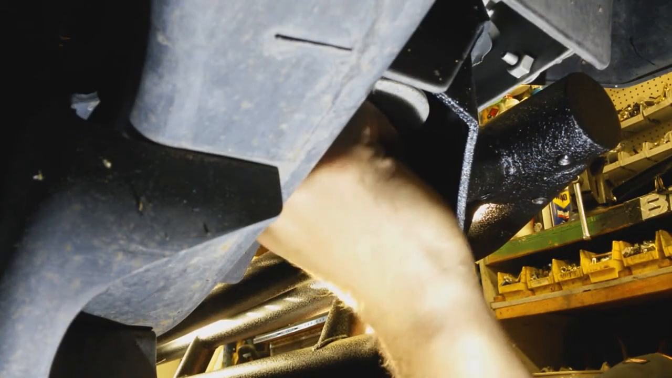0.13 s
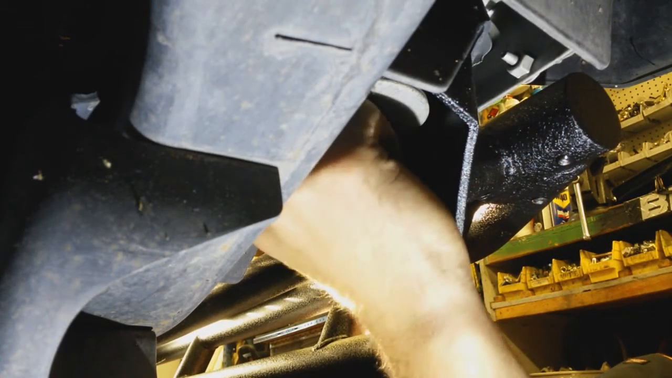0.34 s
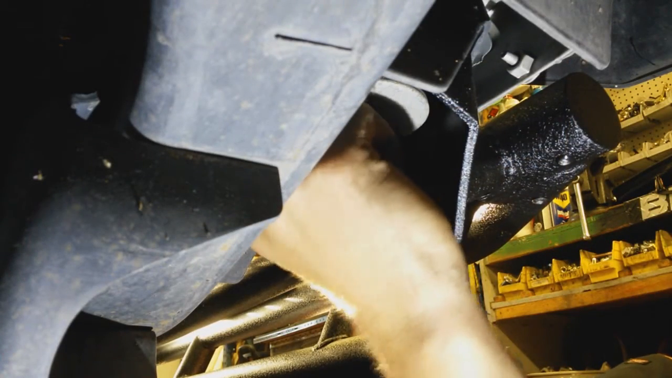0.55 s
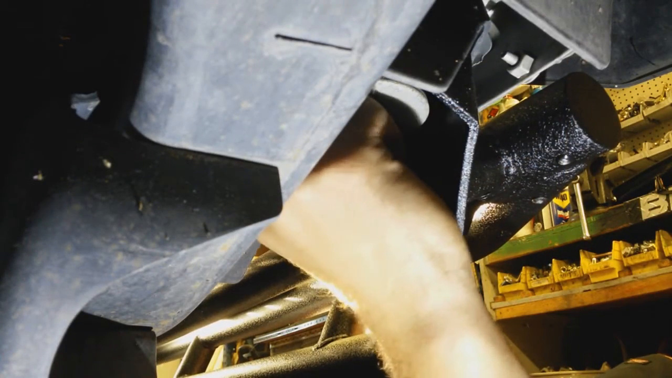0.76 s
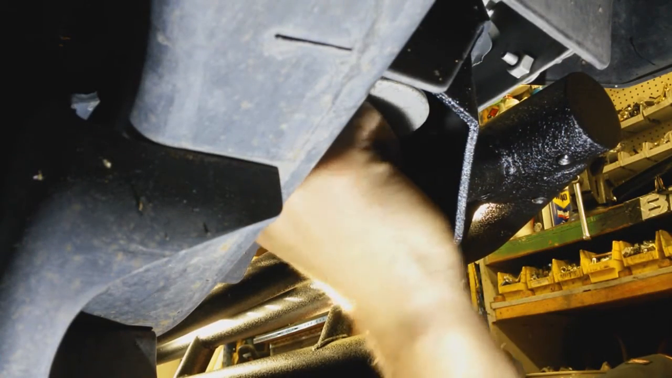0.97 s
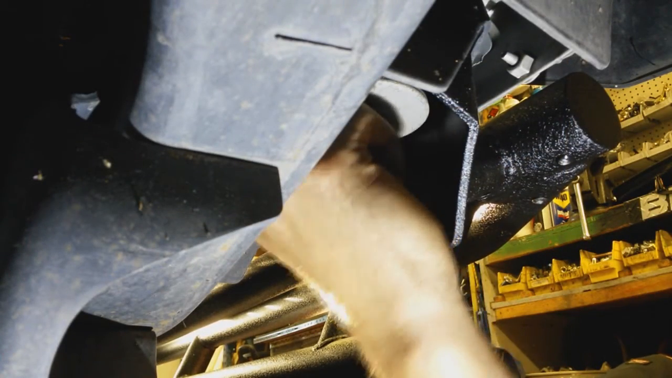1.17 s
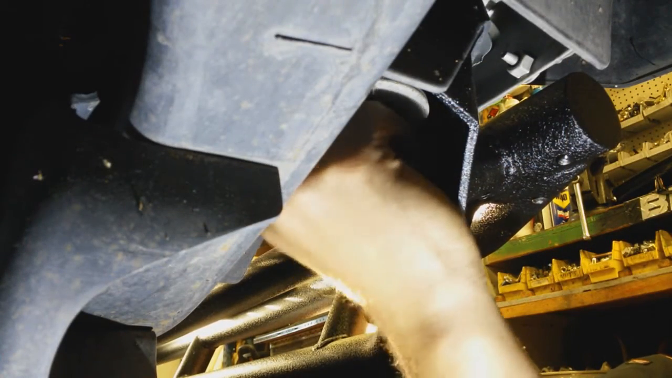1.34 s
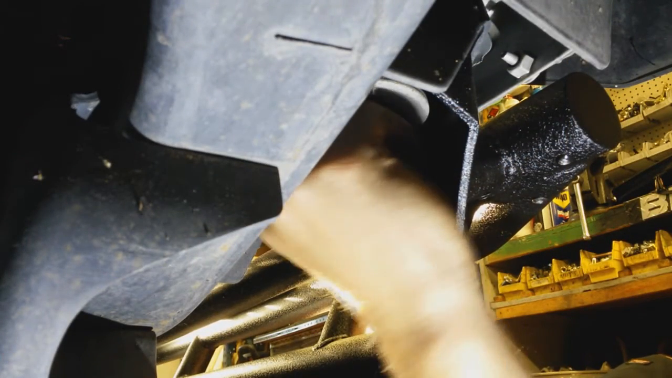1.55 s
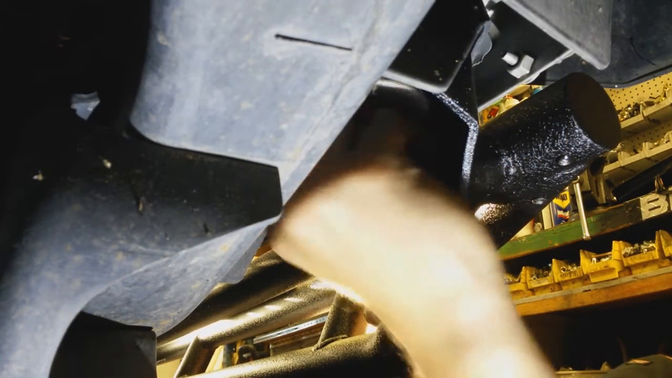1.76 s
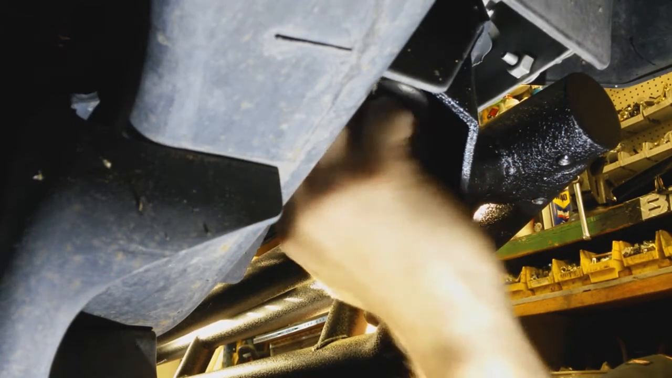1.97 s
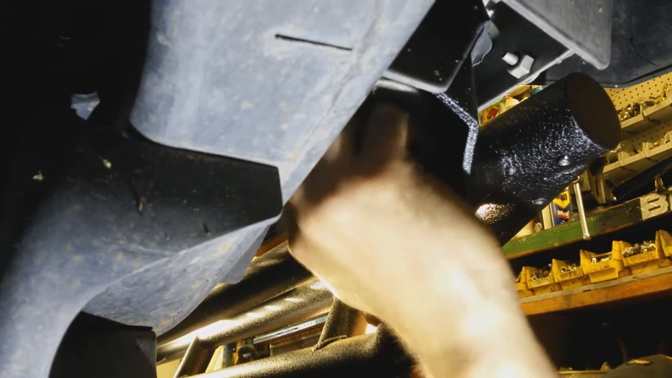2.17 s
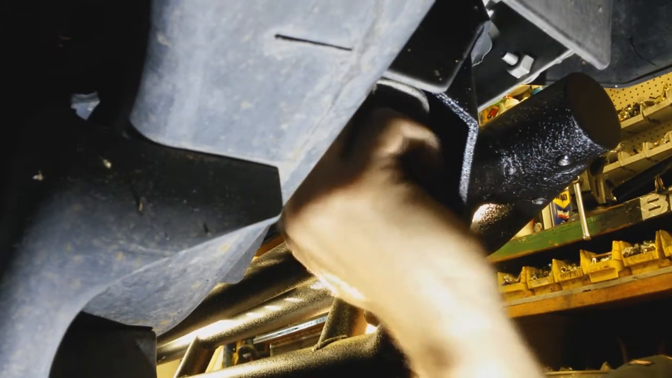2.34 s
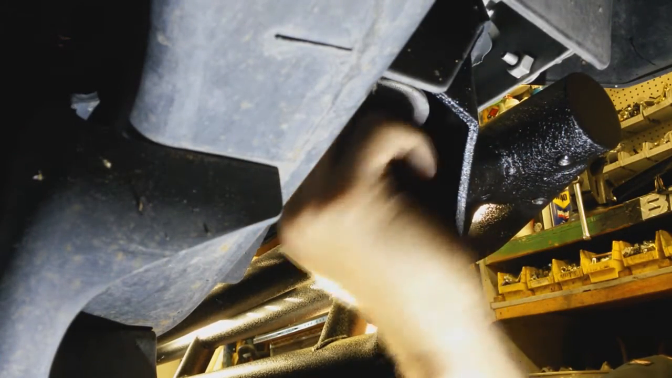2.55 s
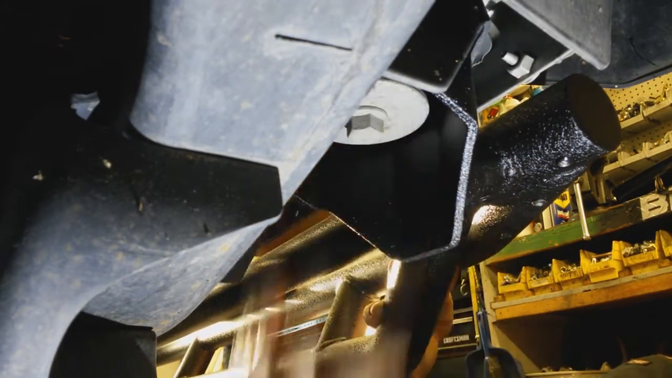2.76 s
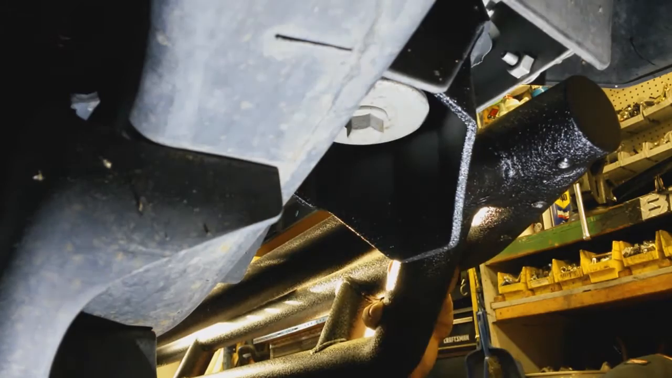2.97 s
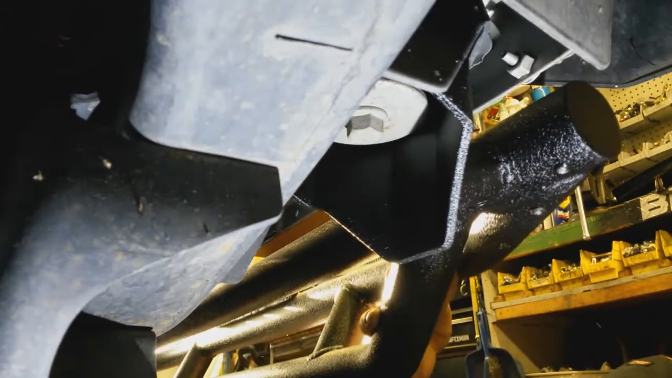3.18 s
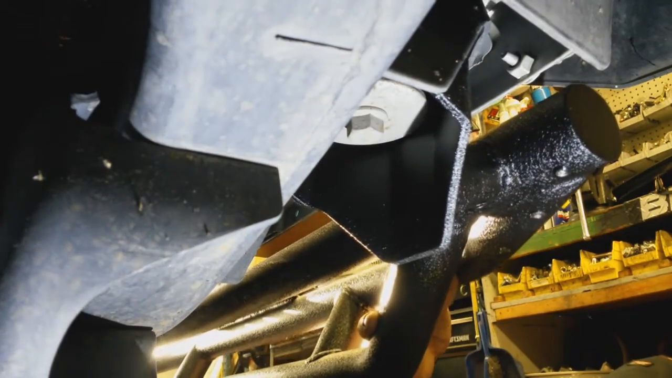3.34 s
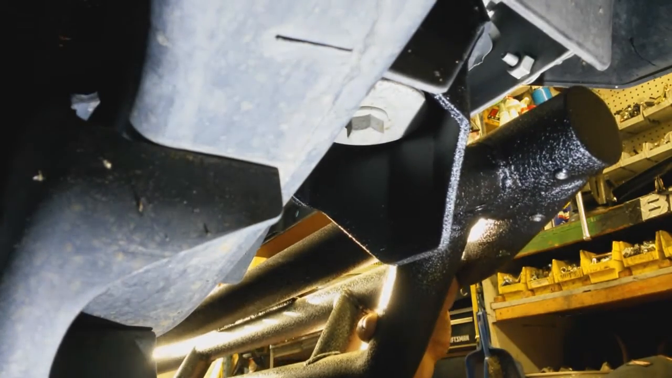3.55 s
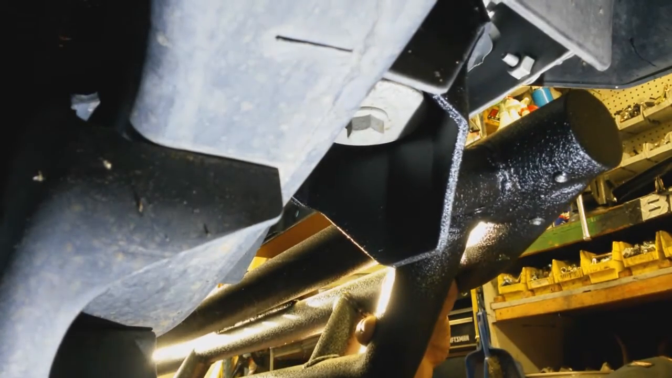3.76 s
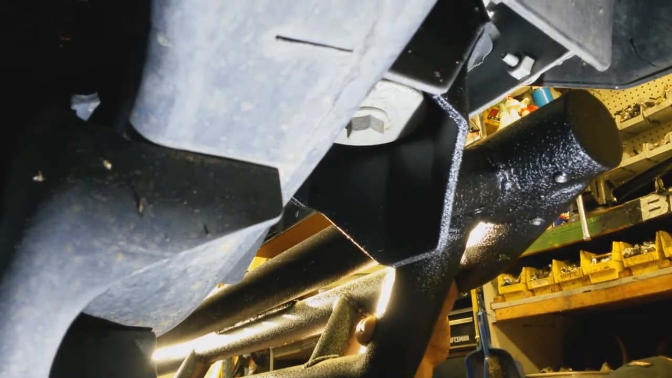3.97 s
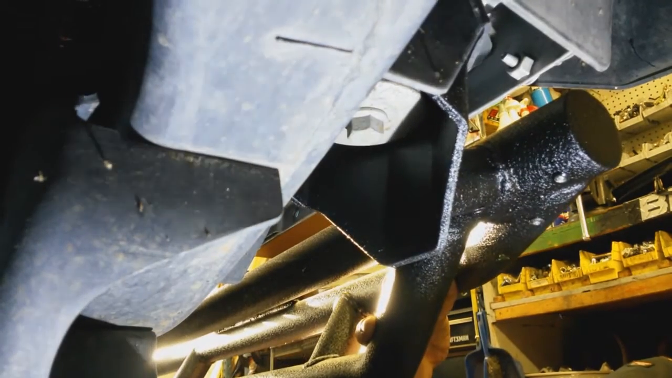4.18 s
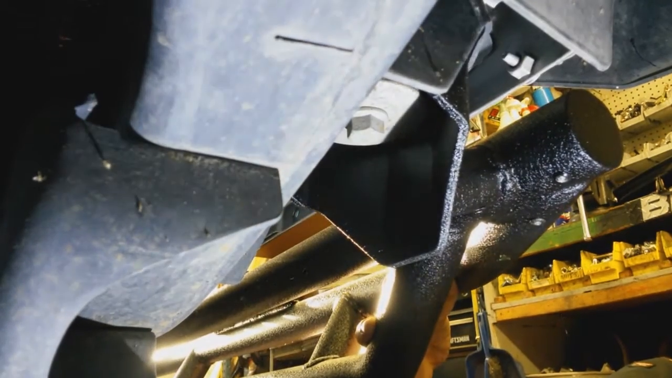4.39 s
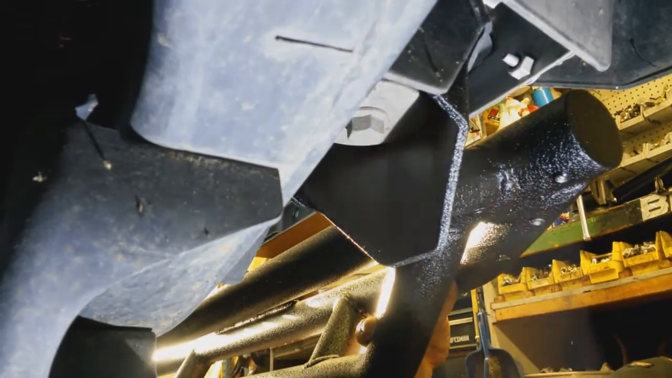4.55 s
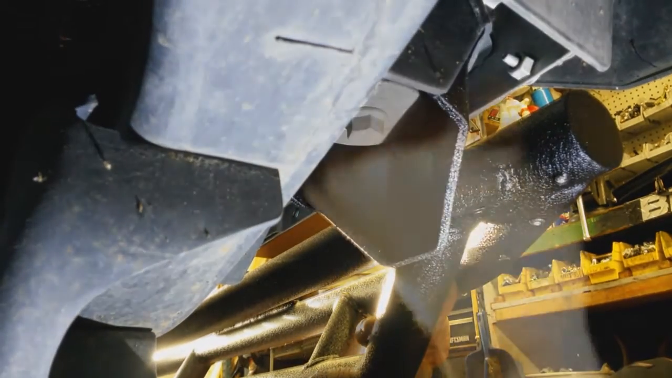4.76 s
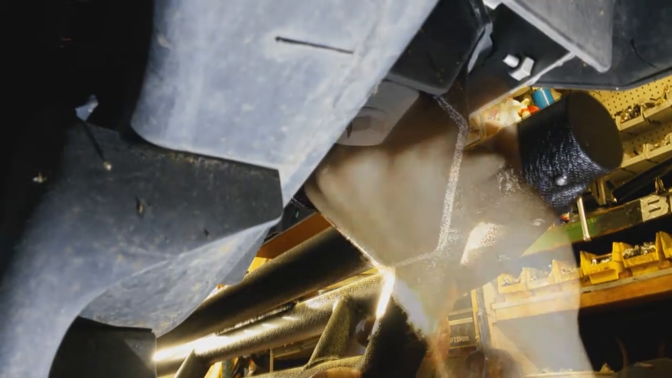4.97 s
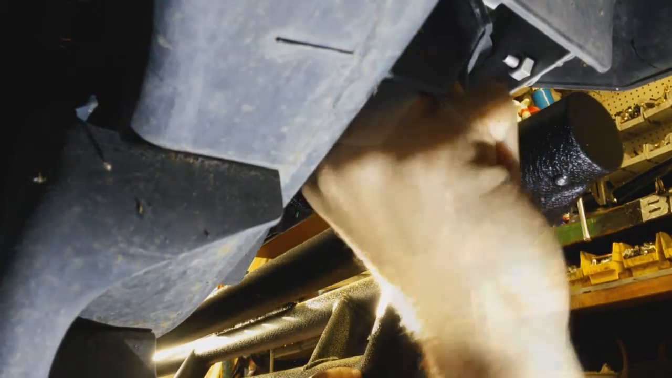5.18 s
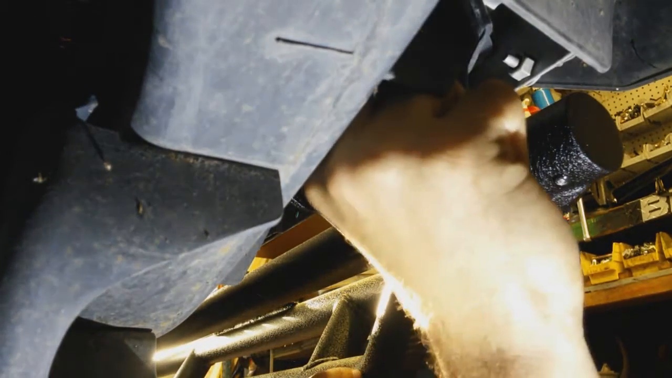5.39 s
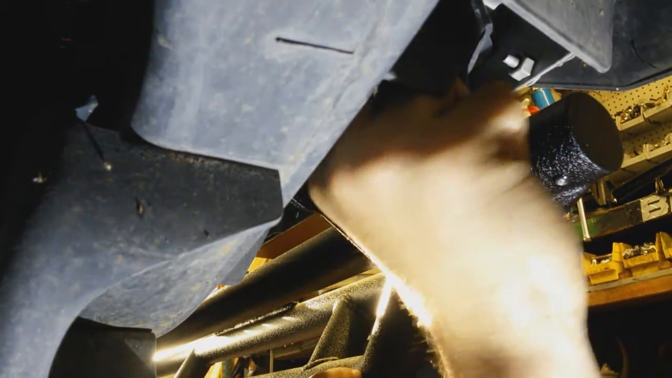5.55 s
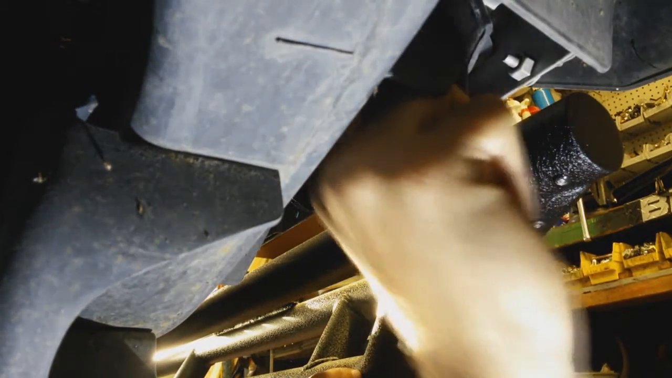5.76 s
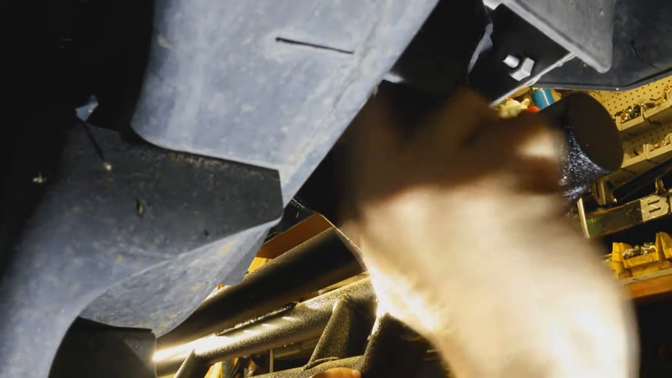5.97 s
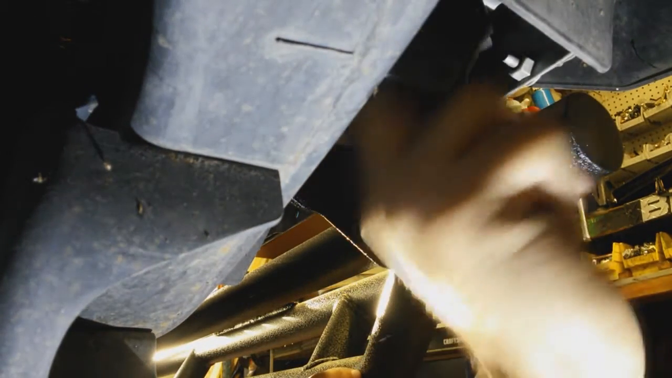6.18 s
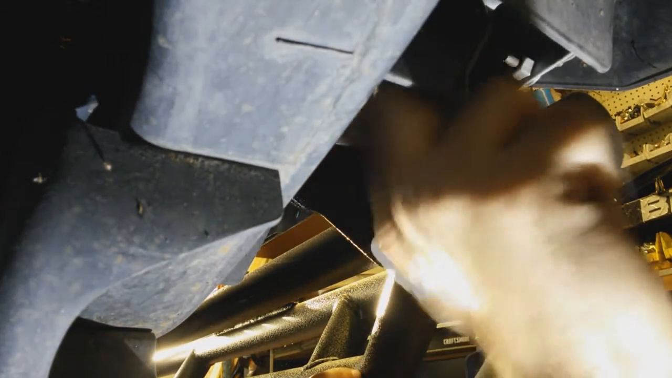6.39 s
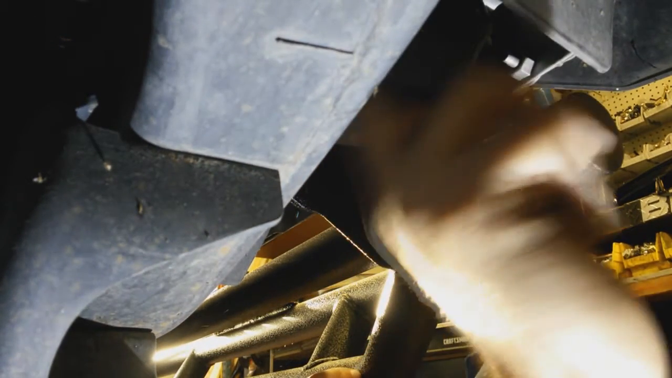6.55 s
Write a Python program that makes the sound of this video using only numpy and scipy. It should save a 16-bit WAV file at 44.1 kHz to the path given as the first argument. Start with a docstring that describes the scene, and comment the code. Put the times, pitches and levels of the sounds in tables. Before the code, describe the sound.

A loose steel washer clanks and scrapes onto a stud under a vehicle, then after a lull a nut clicks sharply, in a quiet rumbling workshop.

```python
"""A big steel washer clatters onto a stud under a vehicle; then a nut is picked up and started on the thread.
Each contact is a burst of noise through the frame's resonances plus the ringing modes of the loose steel.
Slides are runs of tiny slips that make noise in one region of the frame; pressed hard, they groan.
Dull knocks and sharp ticks of handled parts come in between. The room is soft rumble and hiss from shaped noise,
and an engine outside is two gliding sine tones that speed up and then ease off."""
import sys
import numpy as np
from scipy import signal
from scipy.fft import rfft, irfft, next_fast_len
from scipy.io import wavfile
from scipy.ndimage import uniform_filter1d, map_coordinates

SR = 44100
rng = np.random.default_rng(int(sys.argv[2]) if len(sys.argv) > 2 else 0)


def pcm_store(signal):
    """Save signal as 16-bit PCM."""
    levels = np.round(np.clip(np.atleast_2d(signal), -1, 1) * 32767)
    wavfile.write(sys.argv[1], SR, levels.astype(np.int16).T)


N = 292101  # length in samples

# Colour of the noise when the washer hits or slides. Each row: frequency in Hz, level in dB per Hz.
WASHER_COLOUR = [(180, -40.5), (300, -26.5), (482, -20.5), (714, -21.5), (975, -8.5), (1310, -14.5),
                 (1490, -8), (2280, -8.5), (4620, -10.5), (5260, -4.5), (7790, -13), (9330, -10),
                 (11400, -23), (12700, -12), (15000, -39)]
# Ringing modes heard when the nut is struck; the long rows near 3.1 kHz are the washer ringing along with it.
# Each row: frequency in Hz, level in dB, free time to fall by 60 dB in seconds.
NUT_MODES = [(1895, -12, .15), (2250, -10, .22), (3070, -10, .52), (3135, -9, .54), (3165, -10, .5),
             (3403, -12, .3), (3990, -11, .22), (4646, -11, .2), (5279, 4, .3), (5435, 1, .27),
             (5492, 4, .3), (5722, -5, .22), (5790, -6, .22), (6035, -2, .09), (6307, -6, .2),
             (7106, -7, .09), (8559, -10, .1), (9300, -14, .13), (10810, -13, .08)]


def amp(db):
    """Turn decibels into a plain amplitude factor."""
    return 10 ** (np.asarray(db) / 20)


def unit(x):
    """Scale a signal to rms 1."""
    return x / np.sqrt(np.mean(x ** 2) + 1e-20)


def along(points, hz):
    """Read a curve of (Hz, value) points on a logarithmic frequency axis."""
    point_hz, values = np.transpose(points)
    return np.interp(np.log(hz + 1), np.log(point_hz + 1), values)


def curves(rows):
    """Give one value per sample for each column after the time."""
    seconds, *columns = np.transpose(rows)
    return [np.interp(np.arange(N) / SR, seconds, column) for column in columns]


def wobble(rate):
    """Draw a smooth random curve with this many knots a second."""
    knots = rng.standard_normal(int(N * rate / SR) + 4)
    return map_coordinates(knots, [np.arange(N) * rate / SR])


def filtered(x, response):
    """Multiply the spectrum of x by a response of frequency."""
    count = x.shape[-1]
    padded = next_fast_len(count + 4096)
    spectrum = rfft(x, padded) * response(np.fft.rfftfreq(padded, 1 / SR))
    return irfft(spectrum, padded)[..., :count]


def add(track, s, sound):
    """Mix a stereo sound into the track at time s, cutting what lies outside."""
    start = round(s * SR)
    part = sound[:, max(-start, 0):N - start]
    track[:, max(start, 0):][:, :part.shape[1]] += part


def panned(x, pan_db):
    """Lean a stereo pair to the left (positive) or right (negative)."""
    return x * unit(amp([[pan_db / 2], [-pan_db / 2]]))


def frame_noise(shape, colour, lift_db, ripple_db):
    """Noise of rms 1 through the frame: a few main resonances over a thicket of small ones."""
    # Main resonances. Each row: frequency in Hz, width in Hz, strength in dB (a quarter of it shapes the peak).
    frame = [(587, 32, -2.5), (1136, 70, -3), (1590, 33, 2.5), (1794, 31, -2.5), (2220, 8.6, -0.5),
             (2330, 68, -6.5), (3220, 40, -1), (3780, 110, -5.5), (4540, 41, -7), (5350, 110, -4.5),
             (5900, 200, 2.5), (6310, 170, -1), (6640, 170, 1.5), (6850, 23, -2.5)]
    thicket = rng.standard_normal(800)

    def response(hz):
        peaks = [amp(db / 4) / (1 + (2 * (hz - centre) / width) ** 2) for centre, width, db in frame]
        ripple = np.interp(hz, np.linspace(0, SR / 2, len(thicket)), thicket)
        return amp(along(colour, hz) + lift_db * np.max(peaks, axis=0) + ripple_db * ripple)

    return unit(filtered(rng.standard_normal(shape), response))


def dying(x):
    """Under the vehicle each frequency dies away at its own speed."""
    # Each row: frequency in Hz, time to fall by 60 dB in seconds.
    underbody = [(300, 1), (900, 0.37), (2100, 0.27), (2750, 0.37), (3100, 0.23), (3600, 0.32),
                 (5500, 0.16), (13000, 0.26)]
    hz, t, z = signal.stft(x, SR, nperseg=256)
    decay = amp(-60 * t / along(underbody, hz)[:, None])
    return signal.istft(z * decay, SR, nperseg=256)[1][:, :x.shape[1]]


def ring(modes, t, life, scatter_db):
    """Modes are struck at new strengths and heard differently at each ear; life scales their decay time."""
    hz, db, t60 = np.transpose(modes)
    size = amp(db + scatter_db * rng.standard_normal((2, len(hz))))
    phase = np.exp(2j * np.pi * rng.random((2, len(hz))))
    waves = np.exp(np.outer(2j * np.pi * hz - np.log(1000) / (t60 * life), t))
    return ((size * phase) @ waves).real * 2 / np.linalg.norm(size)


def voiced(x, brightness_db, softness):
    """The place of a blow tilts and dents its spectrum, and a soft contact takes off the treble."""
    hard_hz, tilt_from_hz = 14000, 1400  # treble limit at softness 0; brightness acts above the second
    place_db, place_hz = 1.8, 350  # depth and spacing of the random peaks and dents
    peaks_db = place_db * rng.standard_normal(SR // 2 // place_hz + 1)

    def response(hz):
        tilt = amp(brightness_db * np.log2(np.maximum(hz / tilt_from_hz, 1)))
        place = amp(np.interp(hz / place_hz, np.arange(len(peaks_db)), peaks_db))
        return tilt * place / (1 + (hz / hard_hz * 2 ** softness) ** 4)

    x = filtered(x, response)
    return x / np.sqrt(np.mean(x[:, :SR // 30] ** 2))  # the opening 1/30 s has rms 1


def contacts(hits, modes, colour, clatter_t60, tail_db, lift_db, ripple_db, chatter_db, ring_db, crack_db,
             scuff_db, rise_s, pan_db, held=True):
    """Each contact: a brief scuff, a crack and a chattering burst, the ring of the steel and the underbody's answer."""
    # Fingers damp the steel they hold. Each row: time in seconds, share of its free ring, in strength and length.
    grip = [(.4, 1), (.7, 0.57), (2.0, 0.64), (2.3, 0.81), (3.2, 0.56), (4.9, 0.11), (4.97, 0.82),
            (6.2, 0.81)]
    crack_t60 = .008  # seconds for the first sharp crack to fall by 60 dB
    out, t = np.zeros((2, N)), np.arange(SR * 2 // 5) / SR
    lead = SR // 100  # samples of scuff
    noises = frame_noise((len(hits), 2, 2, len(t)), colour, lift_db, ripple_db)
    burst = amp(-60 * t / clatter_t60) + amp(crack_db - 60 * t / crack_t60)
    attack = 1 - np.exp(-t / max(rise_s, 1e-4))
    for (s, db, brightness_db, softness), (clatter, answer) in zip(hits, noises):
        flutter = uniform_filter1d(rng.standard_normal((2, len(t))), 44, axis=1)  # smoothed over 1 ms
        clatter = unit(amp(chatter_db * unit(flutter)) * clatter)
        free = np.interp(s, *np.transpose(grip)) if held else 1
        tone = free * ring(modes, t, free, scatter_db=2.0)
        blow = clatter * burst + amp(tail_db) * dying(answer) + amp(ring_db) * tone
        # the parts graze before they meet
        scuff = amp(scuff_db) * clatter[:, -lead:] * np.linspace(0, 1, lead) ** 2
        sound = voiced(np.hstack([scuff, blow * attack]), brightness_db, softness)
        add(out, s - lead / SR, amp(db) * panned(sound, pan_db))
    return out


def scrape(strokes, centre_hz, width):
    """A run of tiny slips shakes one region of the frame's resonances; width is in octaves."""
    slip_rate, slip_life = 320, .003  # slips a second; seconds for a slip's energy to fall to 1/e
    tail_db, tail_t60 = -18, .22  # weaker, longer tail of a slip; seconds to fall by 60 dB
    out, t = np.zeros((2, N)), np.arange(SR * 2 // 5) / SR
    noises = frame_noise((len(strokes), 2, len(t)), WASHER_COLOUR, lift_db=6.5, ripple_db=11)
    fade = np.exp(-t / slip_life) + amp(tail_db - 60 * t / tail_t60) ** 2  # energy left after one slip
    for (s, length, db), rub in zip(strokes, noises):
        rub = unit(filtered(rub, lambda hz: 1 / (1 + (np.log2((hz + 1) / centre_hz) / width) ** 2)))
        pressure = np.sin(np.pi * np.minimum(t / length, 1))
        happens = rng.random(len(t)) < slip_rate / SR
        slips = happens * rng.exponential(size=len(t)) * pressure ** 2
        energy = np.abs(signal.fftconvolve(slips, fade)[:len(t)])
        level = np.sqrt(energy / (np.mean(energy[t < length]) + 1e-12))
        add(out, s, amp(db) * panned(rub * level, pan_db=-2.5))
    return out


def noise(spectrum, count):
    """Stereo noise of rms 1, alike at both ears in the bass and unrelated in the treble."""
    # Each row: frequency in Hz, left-right likeness from 0 to 1.
    alike = [(60, .9), (150, .8), (370, .5), (940, .05), (15000, 0)]

    def response(hz):
        turn = np.arccos(np.clip(along(alike, hz), -1, 1)) / 2
        return amp(along(spectrum, hz)) * [np.cos(turn), np.sin(turn)]

    mid, side = filtered(rng.standard_normal((2, count)), response)
    return unit(np.array([mid + side, mid - side]))


def washer():
    """The loose washer strikes stud and frame, so it clatters and its many modes ring."""
    # Each row: start in seconds, level in dB, brightness in dB per octave, softness in octaves of lost treble.
    hits = [(0.0, -18, 1, 0.52), (.135, -29.5, 0, 0.36), (.141, -13.5, 4.5, 0.6), (.291, -46.5, -0.5, 0.49),
            (.387, -53.5, 4, 1.24), (.493, -46, -4, 0.24), (.65, -39, -8.5, 0.76), (.826, -37, -5.5, 1.74),
            (.985, -45, -2.5, .5), (.994, -34.5, -3, 0.47), (1.154, -50, -5.5, 0.56),
            (1.45, -43.5, -1, 0.68), (1.473, -33, 0.5, 0.57), (1.545, -38, -6.5, .8),
            (1.552, -25.5, 5.5, 1.55), (1.56, -23.5, 4, 1.54), (1.679, -45, -3.5, 0.5),
            (1.813, -41.5, 6, 2.15), (1.908, -25.5, 6.5, 1.5), (2.005, -32, 4.5, 1.52),
            (2.039, -29, 0.5, 0.99), (2.15, -39.5, 5.5, 1.46), (2.271, -19.5, 2.26, 0.77),
            (2.348, -33.5, 1, .3), (2.394, -34, 1, 0.98), (2.411, -31, 2, 1.15), (2.429, -38.5, -2, .8),
            (2.553, -21.5, 3, 0.68), (2.6, -35, .5, .5), (2.618, -30, 6.5, 1.66), (2.65, -33, 4, 1.17),
            (2.709, -31, 7.5, 1.73), (2.726, -36, -3.5, 0.51)]
    # Each row: frequency in Hz, level in dB, free time to fall by 60 dB in seconds.
    modes = [(845, -12, .4), (921, -7, .55), (1440, -8, .25), (1599, -12, .26), (1803, -5, .35),
             (1939, -9, .25), (2013, -10, .3), (2212, -8, .22), (2365, -4, .25), (2582, -7, .22),
             (2972, -6, .28), (3031, -5, .33), (3064, -6, .3), (3155, -8, .33), (3195, -4, .32),
             (3332, -11, .33), (3478, -11, .33), (3544, -5, .2), (3623, -4, .2), (3820, -6, .21),
             (4027, -8, .24), (4414, -11, .34), (4560, -13, .34), (4764, -8, .17), (5190, -8, .28),
             (5320, -4, .22), (5860, -5, .22), (6530, -8, .16), (8900, -18, .25), (9033, -17, .18)]
    return contacts(hits, modes, WASHER_COLOUR, clatter_t60=.062, tail_db=-5.5, lift_db=7.5, ripple_db=5.0,
                    chatter_db=5.0, ring_db=-10.5, crack_db=-0.5, scuff_db=-26, rise_s=.0011, pan_db=-4.0)


def workshop():
    """The room is low rumbling noise with a thin, slowly drifting hiss on top."""
    # Each row: time in seconds, rumble level in dB.
    room = [(0, -55), (3.1, -56), (4.9, -57), (5.4, -59.5), (6.62, -55.5)]
    # Colours of the rumble and the hiss. Each row: frequency in Hz, level in dB per Hz.
    rumble_colour = [(15, -31), (28, -24.5), (45, -4.5), (75, -2), (130, -4), (240, -8.5), (360, -9.5),
                     (500, -12.5), (900, -19), (2000, -29.5)]
    hiss_colour = [(240, -60.5), (400, -28), (612, -35.5), (816, -27), (1020, -17), (1270, -17.5),
                   (1720, -14), (4530, -13.5), (15000, -26)]
    rumble_db, = curves(room)
    hiss_db = -7 + 1.5 * wobble(2.5)  # against the rumble
    return amp(rumble_db) * (noise(rumble_colour, N) + amp(hiss_db) * noise(hiss_colour, N))


def engine():
    """Two low orders of the engine come through the wall; each swells as it passes a resonance of the room."""
    # It gathers speed, then eases off.
    # Each row: time in seconds, pitch of the fifth order in Hz, level in dB before booms, wobble and wall.
    drive = [(0, 105, -80), (.4, 111, -62), (1.5, 123, -68), (1.85, 127, -58.5), (2.45, 133, -59.5),
             (2.87, 134.5, -69.5), (3.3, 113, -73), (4.8, 100, -65.5), (5.5, 97, -75)]
    # Resonances of the workshop. Each row: frequency in Hz, width in Hz, lift in dB.
    booms = [(134.4, 1.3, 19), (175, 10, 9.5)]
    wall_hz = 187.3  # the wall shuts out what lies above
    seventh_db = -1.5  # seventh order against the fifth
    pitch_hz, db = curves(drive)
    out = np.zeros(N)
    for hz, order_db in [(pitch_hz, 0), (pitch_hz * 7 / 5, seventh_db)]:
        boom_db = sum(lift / (1 + (2 * (hz - centre) / width) ** 2) for centre, width, lift in booms)
        wall = 1 / (1 + (hz / wall_hz) ** 40)
        wave = np.sin(2 * np.pi * np.cumsum(hz) / SR)
        out += amp(db + order_db + boom_db + wobble(9.6)) * wall * wave
    return np.sqrt(2) * out  # a sine of rms 1 peaks at the square root of 2


def slides():
    """Washer or nut slides on steel in short scrapes that shake a broad region of the frame."""
    # Each row: start in seconds, length in seconds, level in dB.
    strokes = [(.655, 0.042, -48), (.826, 0.041, -39), (1.0, 0.044, -41), (1.429, 0.11, -39.5),
               (1.473, 0.065, -39), (1.571, 0.048, -34), (1.642, 0.58, -56), (1.959, 0.09, -40),
               (2.087, 0.1, -55), (2.326, .14, -39.5), (2.6, 0.04, -41), (2.633, 0.14, -43),
               (5.85, .034, -41), (6.191, 0.056, -37.5)]
    return scrape(strokes, centre_hz=1930, width=0.7)


def knocks():
    """Dull knocks of other parts excite short, low modes that no fingers damp."""
    # Each row: start in seconds, level in dB, brightness in dB per octave, softness in octaves of lost treble.
    hits = [(1.39, -51.5, -11, .3), (4.327, -39, -3, 0.18), (4.345, -47, 0.5, .2), (4.359, -46, 0.5, .2),
            (4.58, -64.5, -11.5, .2), (4.811, -63.5, -4.5, .2)]
    # Each row: frequency in Hz, level in dB, time to fall by 60 dB in seconds.
    modes = [(340, -12, .08), (590, -8, .07), (700, -2, .09), (787, 0, .08), (890, -4, .07),
             (1100, -8, .06), (1305, -7, .07), (1500, -9, .06), (1840, -10, .06)]
    # Each row: frequency in Hz, level in dB per Hz.
    colour = [(88, -45), (150, -13.5), (285, -7), (503, -12), (796, -6), (1030, -9), (1850, -6.5),
              (3150, -16), (3780, -11), (4460, -17), (5980, -8), (7730, -19), (12000, -18), (15600, -57),
              (22000, -120)]
    return contacts(hits, modes, colour, clatter_t60=0.13, tail_db=-19, lift_db=0.0, ripple_db=5.5,
                    chatter_db=2.5, ring_db=-3, crack_db=-3, scuff_db=-14, rise_s=.0012, pan_db=-1, held=False)


def groans():
    """Pressed hard, the washer judders and a narrow low region of the frame groans."""
    # Each row: start in seconds, length in seconds, level in dB.
    strokes = [(2.028, 0.055, -43), (2.275, 0.019, -56), (2.586, 0.043, -45.5)]
    return scrape(strokes, centre_hz=493, width=0.03)


def ticks():
    """Small parts being handled make sharp, damped ticks, with the modes of the nut."""
    # Each row: start in seconds, level in dB, brightness in dB per octave, softness in octaves of lost treble.
    hits = [(3.236, -43, -4, .1), (3.531, -60, -8, .3), (3.572, -47.5, -12.5, .3), (3.929, -68.5, -1.5, .2),
            (4.3875, -37.5, -1.5, 0.091), (4.911, -26.5, 3.5, 0.065)]
    # Each row: frequency in Hz, level in dB per Hz.
    colour = [(300, -18), (1400, -10), (3000, -9), (5200, 0), (7500, 0), (10000, -13), (15000, -26)]
    return contacts(hits, NUT_MODES, colour, clatter_t60=.05, tail_db=-13, lift_db=3, ripple_db=2.5,
                    chatter_db=3, ring_db=-8, crack_db=-2, scuff_db=-35, rise_s=.0003, pan_db=-2.5)


def nut():
    """The nut strikes the stud with a short clatter, and its high modes ring."""
    # Each row: start in seconds, level in dB, brightness in dB per octave, softness in octaves of lost treble.
    hits = [(4.967, -33, -4, .1), (5.503, -55.5, -8, 0.67), (5.659, -28.5, -1, 0.25),
            (5.852, -38.5, -5, 0.11), (6.102, -19.5, 0.5, 0.39), (6.22, -23.5, -1.5, 0.81),
            (6.284, -41, -4, .1), (6.508, -15.5, 2, 0.11)]
    # Each row: frequency in Hz, level in dB per Hz.
    colour = [(210, -55.5), (350, -38.5), (646, -26), (885, -27.5), (1230, -19), (1350, -25), (1910, -14.5),
              (3110, -15.5), (3420, -13.5), (5400, -2.5), (7510, -12.5), (9210, -12.5), (12000, -23.5),
              (13400, -18.5), (15000, -36)]
    return contacts(hits, NUT_MODES, colour, clatter_t60=0.035, tail_db=-7.5, lift_db=3.5, ripple_db=2.0,
                    chatter_db=1, ring_db=-11.5, crack_db=-8, scuff_db=-30, rise_s=.0011, pan_db=-6.5)


def scene():
    """The work on the steel is heard over the room and the engine outside."""
    work = washer() + slides() + knocks() + groans() + ticks() + nut()
    return work + workshop() + engine()


def record(dry):
    """Clip at full scale, then cut steeply what lies above the treble limit."""
    top_hz = 14750
    return filtered(np.clip(dry, -1, 1), lambda hz: 1 / (1 + (hz / top_hz) ** 80))


dry = scene()
out = record(dry)
pcm_store(out)
```